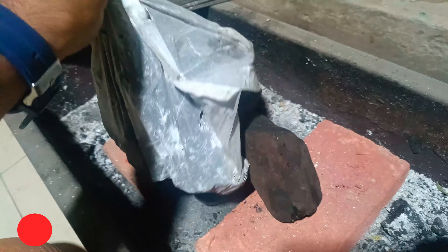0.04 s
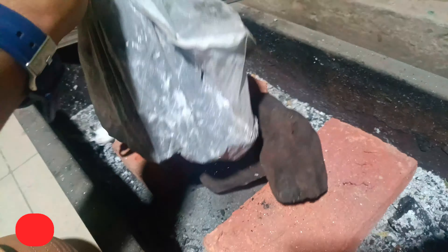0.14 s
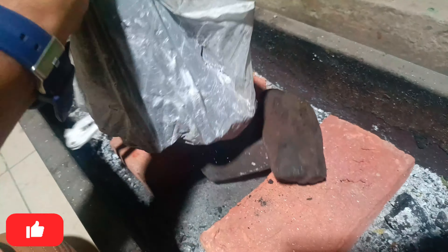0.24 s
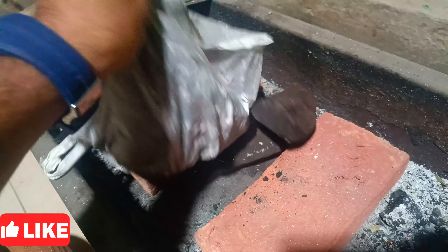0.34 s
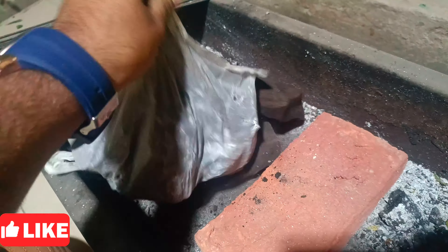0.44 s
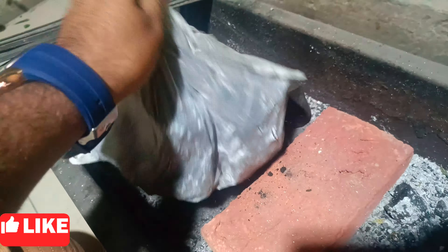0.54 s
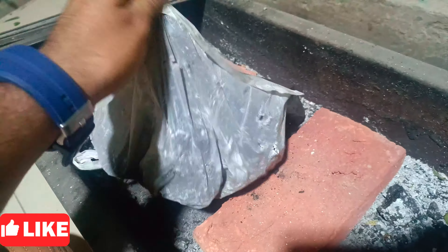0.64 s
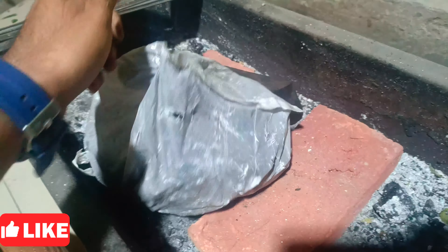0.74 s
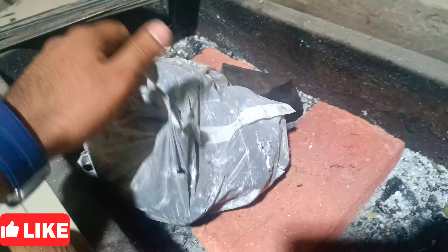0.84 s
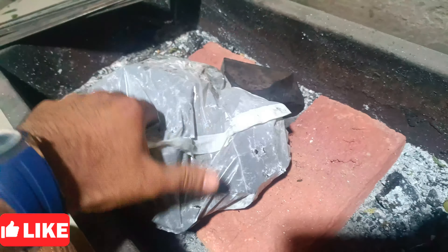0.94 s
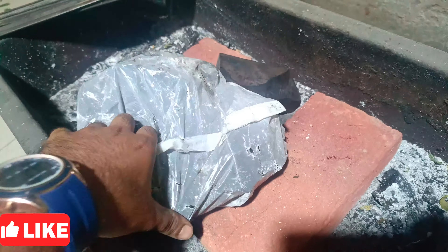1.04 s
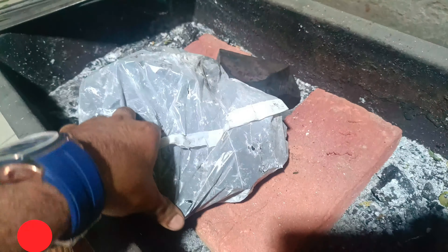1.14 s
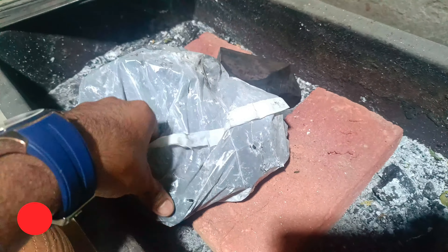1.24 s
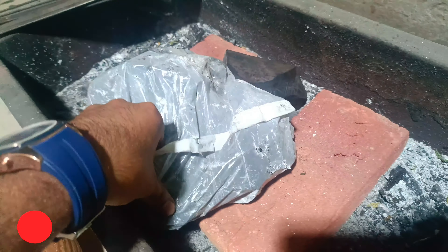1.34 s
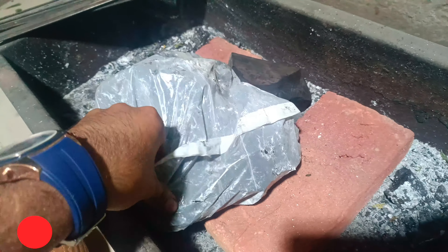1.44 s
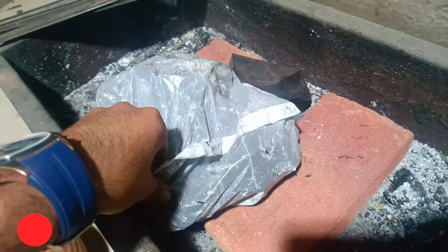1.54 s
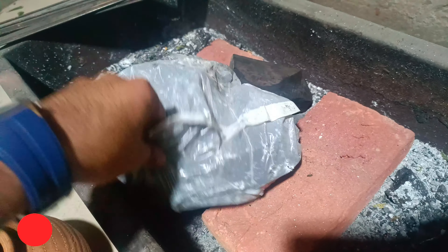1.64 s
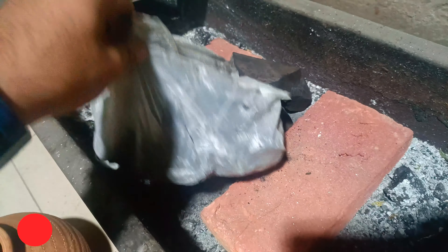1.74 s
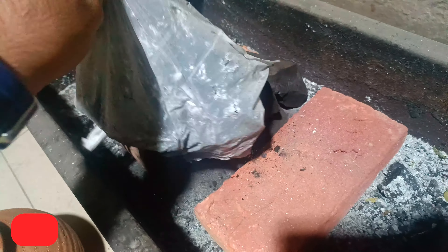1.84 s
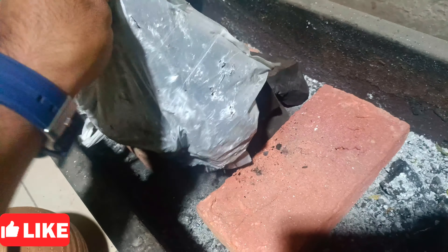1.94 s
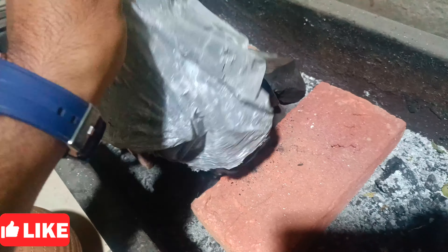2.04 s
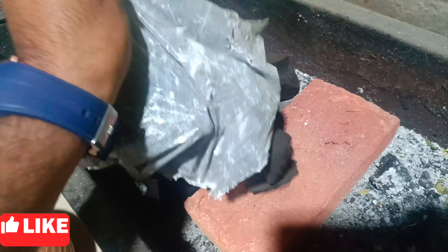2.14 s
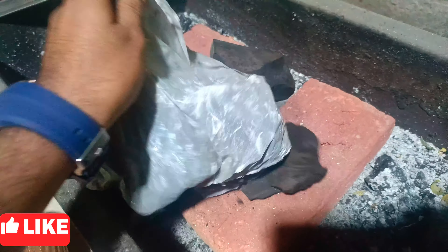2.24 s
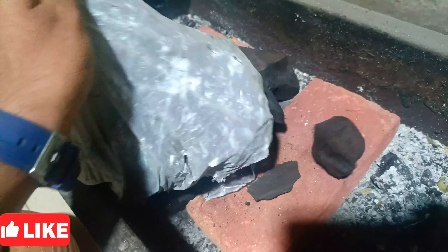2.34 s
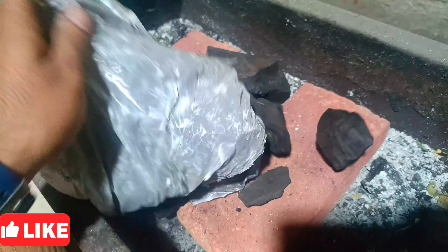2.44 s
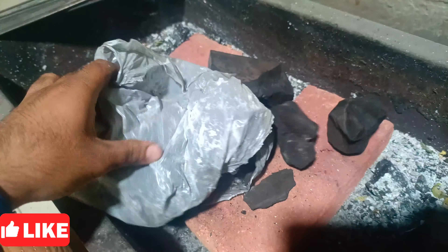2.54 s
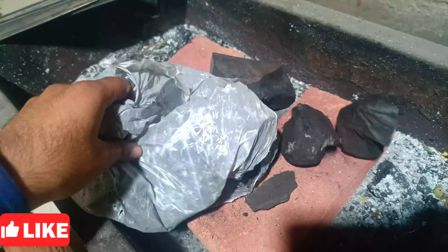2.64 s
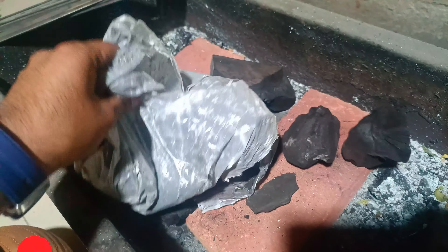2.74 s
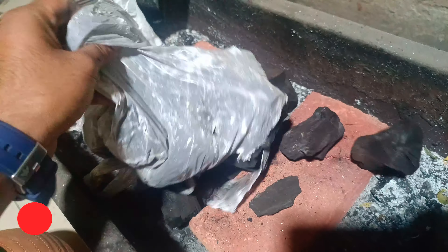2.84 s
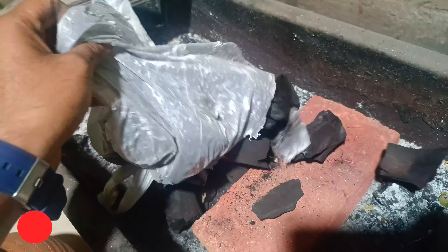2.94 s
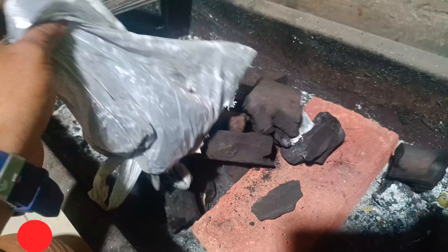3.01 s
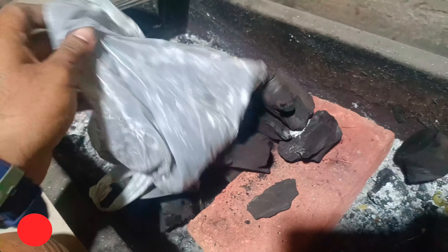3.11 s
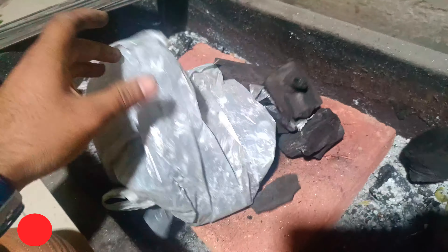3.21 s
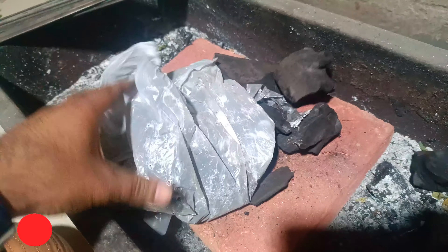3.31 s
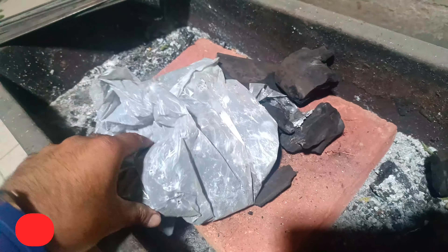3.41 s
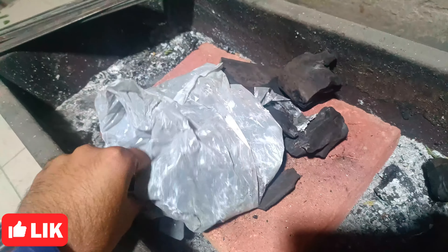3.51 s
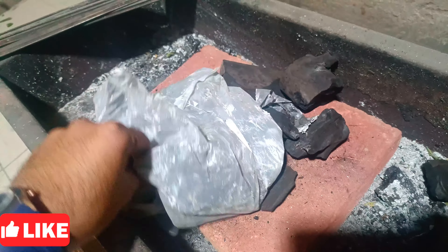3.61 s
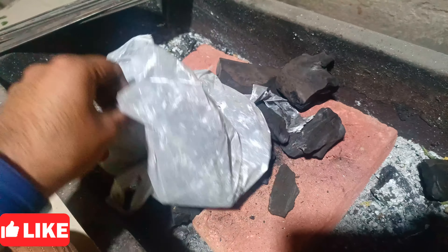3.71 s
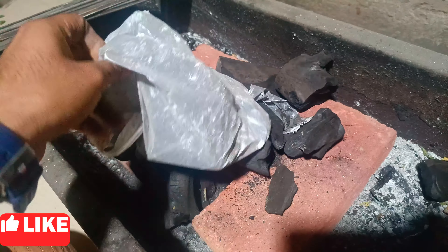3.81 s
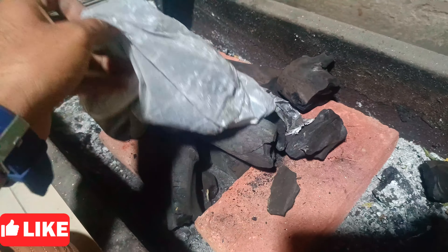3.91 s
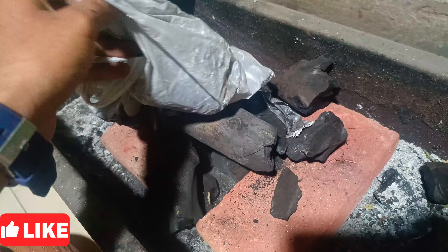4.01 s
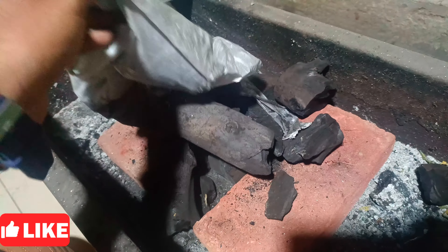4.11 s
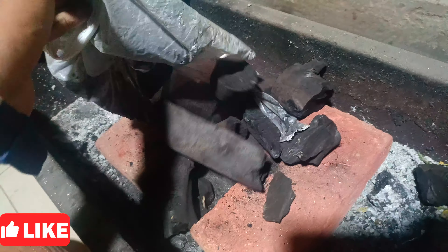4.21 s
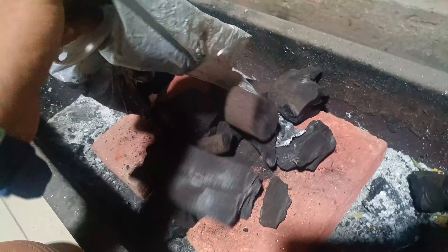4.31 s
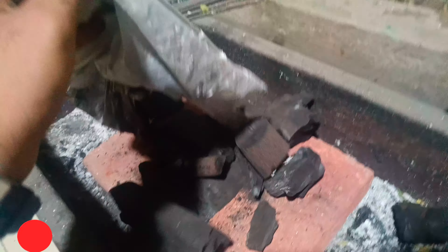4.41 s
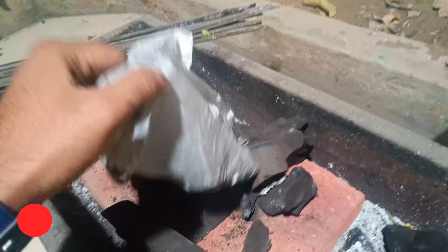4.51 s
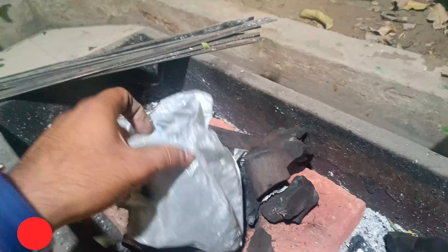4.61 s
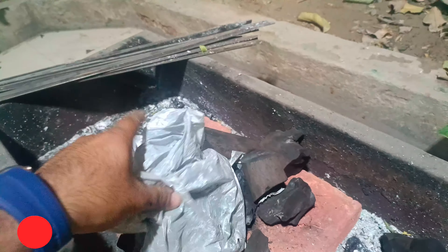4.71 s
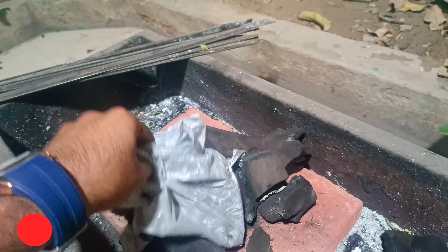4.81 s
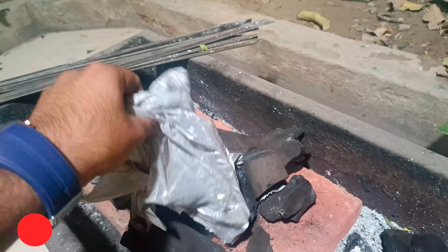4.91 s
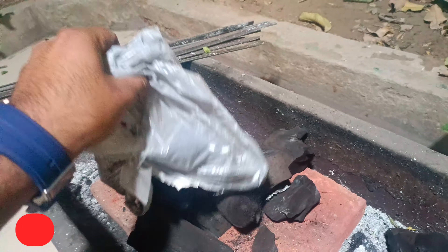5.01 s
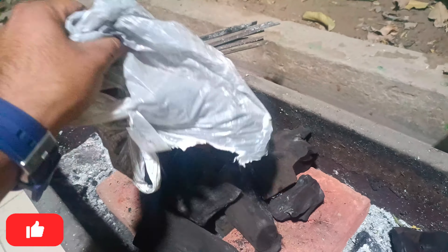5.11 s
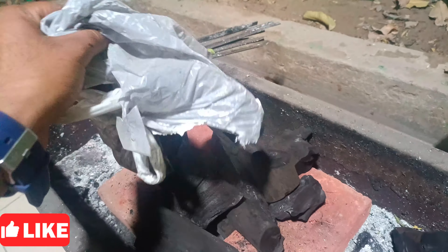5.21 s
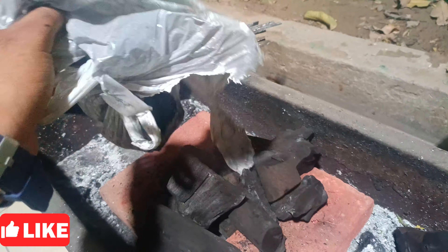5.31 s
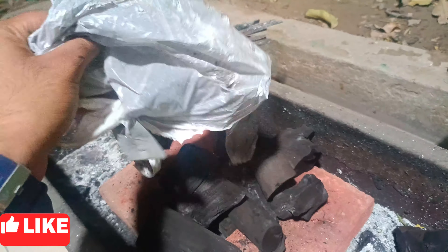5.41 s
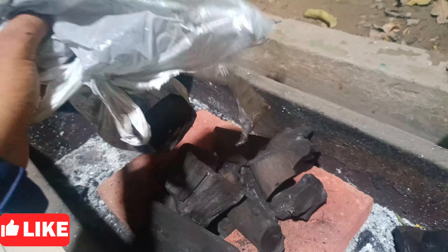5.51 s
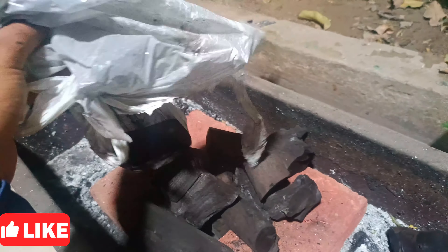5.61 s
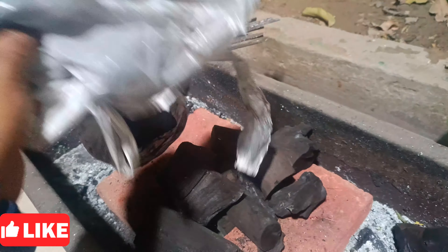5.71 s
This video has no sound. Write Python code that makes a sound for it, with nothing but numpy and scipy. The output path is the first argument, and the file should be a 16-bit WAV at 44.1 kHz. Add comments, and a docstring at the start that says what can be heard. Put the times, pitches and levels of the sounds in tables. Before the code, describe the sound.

Outdoors, close to a phone microphone, charcoal is tipped from a thin plastic bag onto bricks. A bright loud crinkle opens, with one soft thud, then from 0.25 to 1.0 s hollow, dull knocks tumble quickly, strongest near 0.5 s, with crisp crease snaps. From 1.0 to 1.8 s it calms to light rustling, tiny ticks and faint taps. Around 1.8 s the bag crackles sharply and lumps clatter again until 2.8 s, with a clear glassy chink at 2.13 s and hard snaps near 2.3 s. Another cluster of knocks falls at 3.1 to 3.6 s, with a brittle chink, while a low distant engine-like hum surges. A lull follows, the bag barely audible. From 4.3 to 4.8 s lumps knock again, ending in a paired chink. Sparse thuds, a small scratchy catch at 5.3 s and a low windy thump close it.

```python
"""Charcoal tipped from a thin bag.

Lumps tumble onto bricks in a low trough outdoors: dull, hollow thuds from struck resonant modes,
a few glassy chinks from short high rings, and a plastic bag crinkling from dense filtered clicks.
Summed sine orders give low hum surges, an engine somewhere off, and last a short low thump,
perhaps wind; filtered noise is wind on a phone microphone."""
import sys
import numpy as np
from scipy import signal
from scipy.io import wavfile
from scipy.ndimage import uniform_filter1d, minimum_filter1d

SR = 44100
rng = np.random.default_rng(int(sys.argv[2]) if len(sys.argv) > 2 else 0)


def waveform_to_disk(signal):
    """Save audio, clipped to [-1, 1], as 16-bit WAV at the path in sys.argv[1]."""
    frames = np.transpose(np.atleast_2d(signal))
    scaled = np.clip(frames, -1, 1) * 32767
    samples = np.round(scaled).astype(np.int16)
    wavfile.write(sys.argv[1], SR, samples)


N = 253865

# wind strength, relative: time_s, level_db
WIND_LEVELS = [(0.0, -35.5), (0.27, -46), (0.5, -40.5), (1.3, -56.5), (2.7, -35.5), (4.18, -32.5),
               (4.31, -43), (5.03, -33), (5.15, -52), (5.28, -20.5), (5.56, -36), (5.64, -40), (5.76, -31)]
# low hum surges, one table each, the last a short low thump, perhaps wind:
# time_s, fundamental_hz, order_1_db, order_2_db, order_3_db
HUM_SURGES = [
    [(3.08, 57.4, -82, -29, -85), (3.314, 66.1, -27.5, -24, -33.5), (3.562, 68, -38.5, -79, -54),
     (3.752, 66.1, -25, -32, -74), (4.164, 58.86, -31.5, -22, -45), (4.3, 59.6, -38, -47, -54)],
    [(4.55, 51.2, -44, -86, -49), (4.692, 51.3, -33, -40, -42.5), (5.016, 44.5, -22.5, -33, -51),
     (5.082, 45.1, -36.5, -46, -42), (5.416, 42.4, -32, -40, -29.5), (5.52, 34.2, -67, -52, -23)],
    [(5.6, 63, -37.5, -41, -67), (5.67, 64, -17, -66, -67), (5.76, 55.2, -49, -43, -76)],
]

# bag fold resonances, relative: centre_hz, width_hz, level_db
FOLD_PEAKS = [(1186, 187, 20), (2435, 290, 11.5), (3330, 350, 17.5), (3767, 140, 20), (4147, 510, 14.5)]
# bag film resonances, relative: centre_hz, width_hz, level_db
FILM_PEAKS = [(6450, 1230, -1), (9100, 380, -5), (9720, 1000, -10), (14850, 2100, -2.5)]
# rustles, and long faint stretches of hiss beneath them, before clumping:
# full_from_s, held_s, film_db, folds_re_film_db
BAG_STRETCHES = [(0, 0.19, -31, -3.5), (0.269, 0.066, -48, -9.5), (0.472, 0.17, -42, 0),
                 (0.751, 0.009, -40.5, 4.5), (.82, 0.46, -47.5, -4.5), (0.968, 0.096, -43.5, -4.5),
                 (1.13, 0.094, -45, -2), (1.451, 0.0081, -45.5, -4), (1.601, 0.0084, -54.5, -20),
                 (1.857, 0.046, -29, 1), (1.95, 0.14, -48, -7), (2.124, 0.019, -29.5, -1.5),
                 (2.2, 0.2, -47, -0.5), (2.341, 0.15, -39, 1), (2.63, 0.62, -49, -7),
                 (2.641, 0.044, -39.5, -1), (2.768, 0.14, -38, -4.5), (2.998, 0.014, -37, -4.5),
                 (3.124, 0.067, -42, -3.5), (3.312, 0.068, -42.5, -0.5), (3.869, 0.028, -55, -3),
                 (4.069, 0.042, -52.5, -4.5), (4.262, 0.038, -51.5, -3), (3.46, 2.8, -67, 1),
                 (4.758, 0.024, -47, -10), (4.998, 0.095, -52.5, 3.5), (5.29, 0.018, -53.5, 7),
                 (5.603, 0.0066, -60.5, 1.5)]
SWELL_S, FADE_DB_PER_S, BAG_AT_REST_DB = 0.081, 223, -75
# single creases snapping: start_s, level_db
CREASE_SNAPS = [(0.5044, -23.5), (0.7864, -28), (1.03, -29), (1.12, -37), (1.2161, -32), (2.3061, -18),
                (2.3223, -34), (2.3499, -21)]
# stiff bag corner catching on a lump: start_s, level_db, t60_s
CORNER_CATCHES = [(5.273, -29.5, 0.018), (5.288, -34.5, 0.075), (5.304, -34.5, 0.078)]
# crackle band of the catches: low_hz, high_hz
CATCH_BAND_HZ = [2850, 4450]

# hard edges meeting: start_s, level_db, ring_hz
EDGE_CHINKS = [(1.4491, -34.5, 4100), (2.128, -12.5, 3366), (3.172, -20.5, 3140), (4.455, -41.5, 3300),
               (4.6476, -44, 3150), (4.758, -21, 3040), (4.778, -20.5, 3060), (5.344, -37.5, 4300)]
# lumps rolling and jostling: time_s, thud_db, upper_re_thud_db
TUMBLE_LEVELS = [(0.0, -45, 12.5), (0.3, -53.5, 0.5), (0.64, -24.5, -3.5), (0.85, -31.5, -8.5),
                 (1.2, -59.5, 4.5), (1.84, -79.5, -3.5), (1.99, -36, -8), (2.46, -29, 2.5), (2.53, -29, -2),
                 (3.06, -38, -4.5), (3.37, -24, -4), (3.5, -29.5, -11), (3.65, -68.5, 7), (4.36, -44, -5.5),
                 (4.52, -48.5, -3), (4.67, -44, 4.5), (4.95, -61, 7.5), (5.26, -42.5, -7.5), (5.45, -62, 7),
                 (5.76, -45.5, -13.5)]
# clear knocks, levels relative: start_s, thud_db, thud_hz, upper_db, upper_hz
LUMP_KNOCKS = [(0.006, -13.5, 406, -47, 614), (0.268, -3, 252, -50, 616), (0.306, -17.5, 352, -59, 614),
               (0.446, -5, 436, -22, 584), (0.508, 3.5, 383, -10.5, 570), (0.524, -2, 350, -12.5, 620),
               (0.539, -0.5, 330, 0, 746), (0.57, -3, 463, -12.5, 598), (0.711, -7.5, 290, -16, 635),
               (0.748, -2.5, 340, -12.5, 648), (0.844, -13, 304, -44, 657), (0.907, -11.5, 331, -35, 840),
               (0.999, -15, 315, -24, 743), (1.213, -27.5, 395, -38, 940), (1.233, -27.5, 330, -35.5, 918),
               (1.449, -45, 397, -42, 890), (1.813, -7.5, 410, -21.5, 641), (1.858, -2, 413, -20, 600),
               (1.907, -8, 324, -14.5, 737), (2.04, -14.5, 298, -32, 713), (2.126, -10, 303, -21.5, 737),
               (2.145, -11, 342, -12.5, 757), (2.204, 1.5, 403, -5, 556), (2.271, -9, 338, -17, 656),
               (2.331, -4.5, 353, -18, 640), (2.403, -6.5, 417, -12.5, 644), (2.482, -37, 403, -24, 840),
               (2.527, -42, 350, -20, 1100), (2.56, -9, 393, -19, 570), (2.589, -3.5, 298, -17, 626),
               (2.634, -5, 392, -7.5, 772), (2.735, -8.5, 443, -25.5, 590), (2.7666, -13.5, 350, -17, 1200),
               (3.079, -14, 498, -24, 640), (3.121, -0.5, 365, -24, 600), (3.171, -51.5, 397, -22, 910),
               (3.25, -6, 262, -27, 1030), (3.289, -4.5, 302, -23, 1000), (3.303, -3.5, 430, -21, 932),
               (3.416, -12.5, 313, -25, 890), (3.489, 1.5, 421, -4.5, 744), (3.576, -8, 342, -22, 567),
               (4.306, -13, 350, -19.5, 670), (4.384, -6.5, 332, -25.5, 619), (4.471, -1.5, 344, -9.5, 724),
               (4.529, -15.5, 320, -15.5, 697), (4.565, -16.5, 350, -32, 660),
               (4.659, -15.5, 346, -39, 595), (4.725, -16, 318, -26, 713), (4.773, -18, 423, -11, 708),
               (4.782, -6.5, 350, -7.5, 1150), (4.819, -12, 322, -19, 1130), (5.204, -14.5, 346, -27, 585),
               (5.272, -13, 286, -34, 665), (5.536, -12, 505, -27, 620), (5.546, -5, 399, -20.5, 686)]
# modes of heap and trough, levels relative: mode_hz, level_db, t60_s
HEAP_MODES = [(276.7, -1, 0.1), (304.9, -2.5, 0.16), (350, 3, 0.075), (411.5, -1, 0.12), (451, 6, 0.033),
              (600, 8, 0.073), (689.4, 9, 0.037), (837.7, 5.5, 0.058), (930.6, 7.5, 0.051),
              (1030, -1, 0.099), (1100, -2, 0.11), (1285, 0, 0.026), (1625, -24, 0.058)]
UPPER_FROM_HZ = 530
CONTACT_CYCLES = 3.5

LIMIT_AMPLITUDE, CUTOFF_HZ = 0.71, 15700


def from_db(db):
    """Decibels to amplitude gain."""
    return 10 ** (np.asarray(db) / 20)


def rms_one(x):
    """Scale to an rms of 1."""
    return x / np.sqrt(np.mean(x ** 2) + 1e-20)


def in_time(rows):
    """Table columns joined by straight lines, one value a sample."""
    time_s, *columns = np.transpose(rows)
    return [np.interp(np.arange(N) / SR, time_s, column) for column in columns]


def butter(x, hz, kind, order=2):
    """Butterworth filter of any kind."""
    return signal.sosfilt(signal.butter(order, hz, kind, fs=SR, output="sos"), x)


def ring(clicks, hz, t60_s):
    """Two-pole resonator: a unit click starts a decaying sine of initial height 1."""
    radius = from_db(-60 / (t60_s * SR))
    angle = 2 * np.pi * hz / SR
    poles = [1, -2 * radius * np.cos(angle), radius * radius]
    return signal.lfilter([0, np.sin(angle)], poles, clicks + 1e-18)


def drift(hz):
    """Slow chance of spread 1: noise twice through a one-pole low-pass."""
    r = np.exp(-2 * np.pi * hz / SR)
    noise = rng.standard_normal(N + SR)  # first second settles the filter
    return rms_one(signal.lfilter([1], [1, -2 * r, r * r], noise)[SR:])


def grains(per_s, spread_db):
    """Random clicks of either sign; positive spread gives a few large, negative a few small."""
    sizes = from_db(spread_db * np.minimum(rng.exponential(1, N), 4))
    sizes = sizes * rng.choice([-1, 1], N)
    return sizes * (rng.random(N) < per_s / SR)


def resonate(x, peaks, patchy_db):
    """Parallel resonances of alternating sign, each swelling and fading by itself."""
    out = 0
    for k, (hz, width_hz, level_db) in enumerate(peaks):
        r = np.exp(-np.pi * width_hz / SR)
        poles = [1, -2 * r * np.cos(2 * np.pi * hz / SR), r * r]
        zeros = np.array([1, 0, -1]) * (1 - r * r) / 2
        gain = from_db(level_db + patchy_db * drift(12))
        out = out + (-1) ** k * gain * signal.lfilter(zeros, poles, x)
    return out


def dying_bursts(bursts):
    """Sum of sudden onsets with exponential decay; rows are start_s, level_db, t60_s."""
    t = np.arange(N) / SR
    return sum((t > s) * from_db(db - 60 * np.maximum(t - s, 0) / t60_s) for s, db, t60_s in bursts)


def wind(level_db=-4):
    """Low lumpy rumble at the microphone port: band-limited noise with drifting level."""
    rumble = butter(butter(rng.standard_normal(N), 95, "low"), 34, "high")
    strength_db = in_time(WIND_LEVELS)[0] + level_db + 3.2 * drift(4.0)
    return from_db(strength_db) * rms_one(rumble)


def low_hum():
    """Surges of three harmonics on a gliding fundamental; the last is a short low thump."""
    out, t = np.zeros(N), np.arange(N) / SR
    for surge in HUM_SURGES:
        fundamental_hz, *orders_db = in_time(surge)
        phase = 2 * np.pi * np.cumsum(fundamental_hz) / SR
        start_s, end_s = surge[0][0], surge[-1][0]
        fade = np.clip(np.minimum(t - start_s, end_s - t) / 0.11, 0, 1)
        orders = sum(from_db(db) * np.sin((k + 1) * phase) for k, db in enumerate(orders_db))
        out += np.sqrt(2) * fade * orders
    return out


def bag_envelope(levels_db):
    """Stretches swell in a shared time, hold, fade at a shared rate; overlaps add in power."""
    t, power = np.arange(N) / SR, from_db(BAG_AT_REST_DB) ** 2
    for (full_s, held_s, *_), db in zip(BAG_STRETCHES, levels_db):
        rise_db = max(db - BAG_AT_REST_DB, 10)
        loss_db = rise_db * (np.maximum(full_s - t, 0) / SWELL_S) ** 2
        loss_db = loss_db + np.maximum(FADE_DB_PER_S * (t - full_s - held_s), 0)
        power = power + from_db(db - loss_db) ** 2
    return np.sqrt(power)


def bag(clumps_db=1.37, notch_hz=7800):
    """Creases snap by the thousand, in clumps; film and folds colour them."""
    film = butter(resonate(grains(7000, spread_db=3.0), FILM_PEAKS, patchy_db=2.5), 4800, "high")
    # dip of the phone's microphone port
    film = butter(film, [notch_hz * 0.95, notch_hz * 1.05], "bandstop", order=1)
    folds = butter(resonate(grains(3500, spread_db=-2.5), FOLD_PEAKS, patchy_db=3.5), 550, "high")
    _, _, film_db, folds_db = np.transpose(BAG_STRETCHES)
    sound = bag_envelope(film_db) * rms_one(film) + bag_envelope(film_db + folds_db) * rms_one(folds)
    return from_db(clumps_db * drift(43)) * sound


def snaps(t60_s=0.0098):
    """A crease lets go: a bright tick of noise, gone within milliseconds."""
    shape = dying_bursts([(s, db, t60_s) for s, db in CREASE_SNAPS])
    return shape * butter(rng.standard_normal(N), [2500, 11000], "band", order=1)


def scrape():
    """A stiff bag corner catches on a lump: dense band-limited clicks that die away."""
    crackle = butter(grains(6000, spread_db=3), CATCH_BAND_HZ, "band", order=4)
    return dying_bursts(CORNER_CATCHES) * rms_one(crackle)


def chinks(t60_s=0.037, crunch_db=-8, crunch_decay_s=0.032):
    """Brittle edges give a short high ring and a crunch of noise around it."""
    out, t = np.zeros(N), np.arange(SR // 10) / SR
    click = 1.0 * (t == 0)
    for start_s, level_db, hz in EDGE_CHINKS:
        crunch = butter(rng.standard_normal(len(t)), [hz * 0.8, hz * 1.25], "band")
        crunch = crunch * np.exp(-t / crunch_decay_s)
        strike = ring(click, hz, 0.0025) * hz / SR
        sound = from_db(level_db) * (ring(strike, hz, t60_s) + from_db(crunch_db) * crunch)
        i = int(start_s * SR)
        out[i:i + len(t)] += sound
    return out


def is_thud(hz):
    """Low modes are the thud, the rest the woody ring."""
    return hz < UPPER_FROM_HZ


def soften(rings):
    """Charcoal is soft: low-pass the thuds, band-limit the upper modes."""
    thuds = sum(x for x, mode in zip(rings, HEAP_MODES) if is_thud(mode[0]))
    upper = butter(butter(sum(rings) - thuds, 480, "high"), 1450, "low", order=9)
    return butter(thuds, 830, "low", order=4), upper


def tumble(per_s=350):
    """Small bumps come thick and at random, each exciting the modes unevenly."""
    thud_db, upper_db = in_time(TUMBLE_LEVELS)
    bumps = grains(per_s, spread_db=-2.0)
    rings = []
    for hz, level_db, t60_s in HEAP_MODES:
        gain = from_db(level_db + 2.0 * drift(3.0))
        rings.append(ring(bumps * rng.standard_normal(N) * gain, hz, t60_s))
    thuds, upper = soften(rings)
    return from_db(thud_db) * (rms_one(thuds) + from_db(upper_db) * rms_one(upper))


def knocks(thud_gain_db=-7, upper_gain_db=-3, focus_db_per_oct=30, upper_focus_db_per_oct=48,
           rattle_s=0.065, rebound_db=-6, fading_db=-1.15, grit_db=37, count=10):
    """A lump lands, rattles to rest in weaker contacts, and rings the modes nearest its size."""
    start_s, thud_db, thud_hz, upper_db, upper_hz = np.transpose(LUMP_KNOCKS)
    first = (start_s * SR).astype(int)
    luck = rng.standard_normal((len(start_s), count + 1, len(HEAP_MODES)))
    # every mode catches its own contacts
    gaps_s = rattle_s / count * rng.uniform(0.15, 1.85, (len(start_s), count, len(HEAP_MODES)))
    later = ((start_s[:, None, None] + np.cumsum(gaps_s, axis=1)) * SR).astype(int)
    weaker = from_db(rebound_db + fading_db * np.arange(count))
    rings = []
    for k, (hz, level_db, t60_s) in enumerate(HEAP_MODES):
        if is_thud(hz):
            share_db = thud_db + thud_gain_db - focus_db_per_oct * np.abs(np.log2(hz / thud_hz))
        else:
            off_oct = np.abs(np.log2(hz / upper_hz))
            share_db = upper_db + upper_gain_db - upper_focus_db_per_oct * off_oct
        blow = from_db(level_db + share_db)
        clicks = np.zeros(N)
        # alternating signs start the modes out of step: no click
        np.add.at(clicks, first, (-1) ** k * blow * from_db(2.0 * luck[:, 0, k]))
        np.add.at(clicks, later[:, :, k], blow[:, None] * weaker * luck[:, 1:, k])
        # soft contact: a few cycles long
        contact = ring(clicks, hz, CONTACT_CYCLES / hz) * 14 * hz / (CONTACT_CYCLES * SR)
        rings.append(ring(contact, hz, t60_s))
    thuds, upper = soften(rings)
    grit = butter(rng.standard_normal(N), [1200, 1900], "band")
    grit = grit * uniform_filter1d(np.abs(upper), size=661)
    # lumps still in the moving bag grind as they knock
    grit = grit * bag_envelope(np.transpose(BAG_STRETCHES)[2])
    return thuds + upper + from_db(grit_db) * grit


def scene():
    """Background, bag and coal summed; small lumps radiate little bass, so coal is high-passed."""
    background = wind() + low_hum()
    plastic = bag() + snaps() + scrape()
    coal = butter(knocks() + tumble(), 175.7, "high", order=4)
    return (background + plastic + chinks() + coal)[None]


def record(dry):
    """A quick limiter holds the peaks, then a steep low-pass cuts the top."""
    needed = np.minimum(1, LIMIT_AMPLITUDE / (np.abs(dry) + 1e-9))
    gain = uniform_filter1d(minimum_filter1d(needed, size=61), size=61)
    lowpass = signal.ellip(10, 0.5, 70, CUTOFF_HZ, fs=SR, output="sos")
    return signal.sosfilt(lowpass, gain * dry)


dry = scene()
out = record(dry)
waveform_to_disk(out)
```